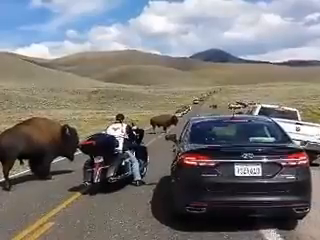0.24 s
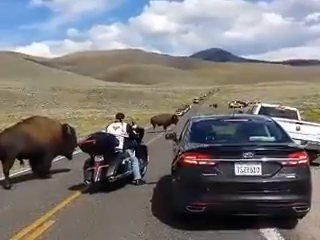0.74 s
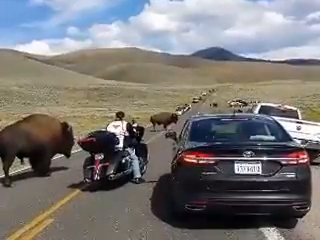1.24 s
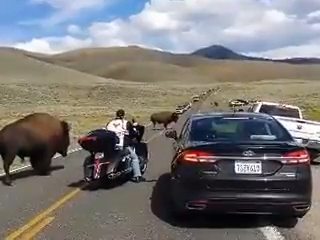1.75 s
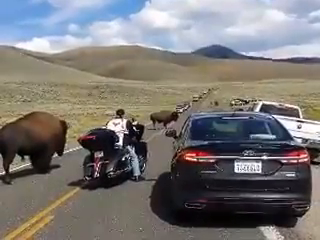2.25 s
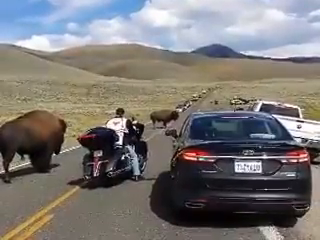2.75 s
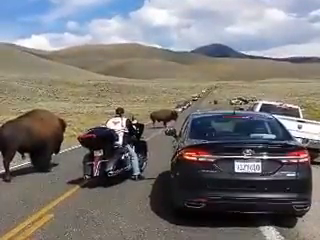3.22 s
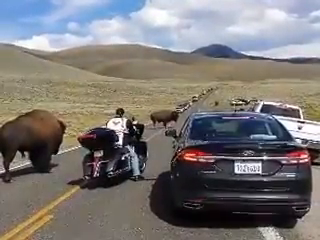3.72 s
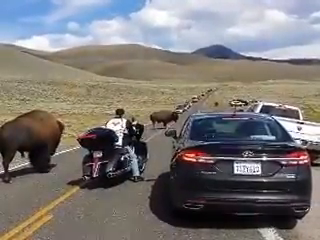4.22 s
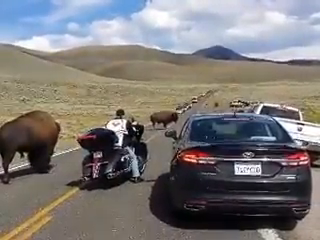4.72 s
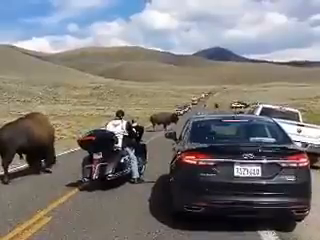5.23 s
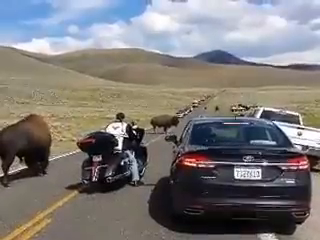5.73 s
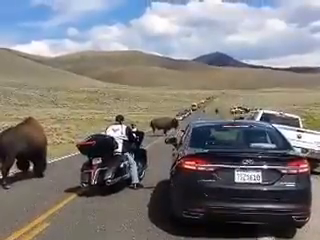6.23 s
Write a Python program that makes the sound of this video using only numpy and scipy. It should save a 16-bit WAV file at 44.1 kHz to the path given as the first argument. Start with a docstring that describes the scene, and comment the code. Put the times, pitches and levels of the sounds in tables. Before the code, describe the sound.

Outdoors on an open grassland road, idling cars give a quiet, steady low rumble, a slightly wavering hum and a soft hiss for all 6.3 seconds. At 0 a bison bull is already in a deep, guttural bellow, its irregular pops ringing a long throat; it closes down and fades by about 0.6. Wind bumps flutter low on the left, strongest around 0.8-1.2 and again near 1.8-1.9. From about 2.5 to 3.0 comes a short breathy grunt from the left, with sharp dry clicks and tiny rising squeaks. At 3.4 the long bellow bursts out nearly ahead, loudest from 3.5 to 4.5, rough, rattling and pulsing, with hissing air and a faint whistle. It weakens through 5.3 into a faint low rumble, leaving the cars. Stereo microphone outdoors, only a thin, short scattered reflection.

```python
"""A bison bull on a road in open grassland bellows beside a line of idling cars, whose rumble, hum and hiss last throughout.
His slack vocal folds flap irregularly; each pop rings the long throat anew, its lowest resonance carrying the roar.
Light wind then bumps the left microphone port, before a short grunt with sharp crackling clicks and tiny squeaks.
A long bellow follows and dies in a rumble; turbulent air hisses and whistles through his mouth in each call."""
import sys
import numpy as np
from scipy import signal
from scipy.fft import rfft, irfft, next_fast_len
from scipy.io import wavfile
from scipy.ndimage import uniform_filter1d, map_coordinates

SR = 44100
rng = np.random.default_rng(int(sys.argv[2]) if len(sys.argv) > 2 else 0)


def output_pcm(signal):
    """Save a mono or channel-first signal as 16-bit PCM at the path in sys.argv[1].

    Samples are clipped to [-1, 1] before scaling.
    """
    pcm = np.clip(np.atleast_2d(signal).T, -1, 1) * 32767
    wavfile.write(sys.argv[1], SR, np.round(pcm).astype(np.int16))


N = 285327


def amp(db):
    """Level: decibels become an amplitude ratio."""
    return 10 ** (np.asarray(db) / 20)


def unit(x):
    """Normalisation: a signal scaled to rms 1."""
    return x / np.sqrt(np.mean(x ** 2) + 1e-20)


def along(points, hz):
    """Spectral envelope: (frequency, value) points joined on a logarithmic frequency axis."""
    f, v = np.transpose(points)
    return np.interp(np.log(hz + 1), np.log(f + 1), v)


def curves(rows):
    """Linear interpolation: one value per sample for each column after the time."""
    s, *cols = np.transpose(rows)
    return [np.interp(np.arange(N) / SR, s, c) for c in cols]


def posture(table, opening):
    """Articulation: each column of a table at the mouth's present opening."""
    steps, *cols = np.transpose(table)
    return [np.interp(opening, steps, c) for c in cols]


def wobble(rate):
    """Random modulation: a smooth curve through random knots, rate of them a second."""
    knots = rng.standard_normal(int(N * rate / SR) + 4)
    return map_coordinates(knots, [np.arange(N) * rate / SR])


def swell(s, length):
    """Gaussian envelope: a smooth rise and fall around time s, with half length in s."""
    return np.exp(-2 * ((np.arange(N) / SR - s) / length) ** 2)


def filtered(x, response):
    """Linear filtering: the spectrum of x times a complex frequency response."""
    m = next_fast_len(N + SR // 2)
    return irfft(rfft(x, m) * response(np.fft.rfftfreq(m, 1 / SR)), m)[..., :N]


def equal_power_pair(balance_db):
    """Constant-power balance: left and right gains for a given left-right level difference."""
    pair = amp([balance_db / 2, -balance_db / 2])
    return pair / np.sqrt(np.mean(pair ** 2, axis=0))


# likeness of noise at the two ports: pitch_hz (Hz), correlation (-1 to 1)
PORT_CORRELATION = [(30, 1), (150, 0.87), (500, 0.75), (1000, 0.3), (2000, 0), (4000, 0), (12000, 0.026)]


def rush(spectrum):
    """Partial coherence: stereo noise of rms 1, alike in the bass and unrelated in the treble."""
    def mid_side(hz):
        angle = np.arccos(np.clip(along(PORT_CORRELATION, hz), -1, 1)) / 2
        return amp(along(spectrum, hz)) * [np.cos(angle), np.sin(angle)]

    mid, side = filtered(rng.standard_normal((2, N)), mid_side)
    return unit(np.array([mid + side, mid - side]))


def ring(drive, hz, width):
    """Resonance: a damped mode of moving frequency; a unit pulse rings at amplitude 1."""
    turn = np.exp(2j * np.pi * np.cumsum(hz) / SR)
    decay = np.exp(-np.pi * width / SR)
    return np.imag(turn * signal.lfilter([1], [1, -decay], drive / turn))


# tones of the idling engine: pitch_hz (Hz), level_db (dB, peak amplitude before the waver)
ENGINE_TONES = [(161.5, -39.5), (324, -40.5), (393, -50.5), (716, -52), (877, -70)]
# spectrum of the cars' rumble: pitch_hz (Hz), level_db (relative dB per Hz)
RUMBLE_SPECTRUM = [(15, 1), (26, -20), (36, -7), (55, -5.5), (80, 0.5), (160, -2), (260, -8), (400, -8.5),
                   (550, -13.5), (750, -13), (1000, -16), (1500, -19.5), (2500, -28.5), (4000, -87)]
# spectrum of the even hiss: pitch_hz (Hz), level_db (relative dB per Hz)
HISS_FLOOR_SPECTRUM = [(1200, -10), (2300, 2.5), (3500, 6.5), (4100, -0.5), (5300, 5), (6100, 2),
                       (6800, -2), (8000, 4), (9400, -3.5), (10400, -2.5), (11700, -9.5), (15000, -15.5)]


def roadside():
    """Periodic and random sources: idling cars hum at a slightly uneven speed and rumble under a hiss."""
    waver_db = 1.2
    turning = np.arange(N) / SR + np.cumsum(.008 * wobble(14)) / SR
    hum = np.zeros(N)
    for hz, db in ENGINE_TONES:
        hum += amp(db + waver_db * wobble(2.84)) * np.sin(2 * np.pi * hz * turning)
    rumble = amp(-35.0 + waver_db / 2 * wobble(4.0)) * rush(RUMBLE_SPECTRUM)
    hiss = amp(-45.0 + 0.27 * wobble(2.63)) * rush(HISS_FLOOR_SPECTRUM)
    # the two ports colour the treble differently: (Hz, left-right dB)
    tilt = [(2500, -1.0), (4500, 0.0), (5800, 5.5), (7000, -6.5),
            (8200, -14.0), (10000, -16.5), (12000, -3.0)]
    hiss = filtered(hiss, lambda hz: equal_power_pair(along(tilt, hz)))
    return hum + rumble + hiss


CALM_DB, GUST_DB = -54.5, -32.5  # the breeze and its one broad gust, left port, before random gusting
GUST_S, GUST_LENGTH_S = 0.68, 1.0  # the gust's centre and half length
# short wind bumps: start_s (s, centre), level_db (dB, envelope peak), pitch_hz (Hz)
WIND_BUMPS = [(0.814, -11.5, 93), (0.871, -15, 110), (1.115, -16, 117), (1.15, -8, 131), (1.186, -15, 84.5),
              (1.755, -15.5, 88), (1.846, -19, 80), (1.882, -12, 97)]
# spectrum of the low wind flutter: pitch_hz (Hz), level_db (relative dB)
WIND_SPECTRUM = [(15, -15), (50, 11), (90, 5.5), (150, 9), (260, -5), (600, -46), (1200, -120)]


def wind(spread):
    """Turbulent pressure: short eddies and a low flutter on the left port, little on the right."""
    t = np.arange(N) / SR
    strength = amp(CALM_DB) + amp(GUST_DB) * swell(GUST_S, GUST_LENGTH_S)
    gusts = strength * amp(5 * wobble(11)) * rush(WIND_SPECTRUM)[0]
    for s, db, hz in WIND_BUMPS:
        phase = rng.uniform(0, 2 * np.pi)
        gusts += amp(db) * np.exp(-np.abs(t - s) / spread) * np.sin(2 * np.pi * hz * (t - s) + phase)
    return gusts * amp([[0], [-19]])  # left, right


SCATTER_DB = -18
# decay of the scattered sound: pitch_hz (Hz), t60_s (s to fall 60 dB)
SCATTER_DECAY = [(200, 0.5), (1000, 0.35), (6000, 0.05)]


def scatter(x):
    """Diffuse reflection: a thin answer from the cars and the slopes, dying sooner in the treble."""
    hz, t, z = signal.stft(rng.standard_normal((2, SR // 2)), SR, nperseg=256)
    fall = amp(-60 * t / along(SCATTER_DECAY, hz)[:, None])
    tail = signal.istft(z * fall, SR, nperseg=256)[1]
    tail = tail + 0.86 * tail[::-1]  # each port shares the other's tail
    delayed = np.pad(x, (500, 0))[None]  # samples
    return signal.fftconvolve(delayed, tail / np.linalg.norm(tail[0]), axes=1)[:, :N]


# first bellow, grunt, long bellow, one list each:
# start_s (s), effort_db (relative dB), rasp_db (upper resonances, relative dB)
CALLS = [
    [(0, 3, -26), (.06, -12.5, -32), (.1, -14, -26), (.14, -11, -20), (.195, -12, -29), (.25, -12, -30.5),
     (.29, -11, -32), (.39, -14.5, -33), (.44, -19, -37), (.48, -18, -30), (.52, -34, -55), (.57, -19, -42),
     (.66, -55, -53)],
    [(2.62, -36, -38), (2.69, -41, -44), (2.72, -32, -27), (2.76, -32, -35), (2.79, -31, -46),
     (2.865, -21, -38), (2.895, -31, -52), (2.96, -35, -42)],
    [(3.34, -36, -54), (3.38, -39, -36), (3.43, -18, -25), (3.47, -5.5, -17), (3.51, -16, -27),
     (3.55, -15, -14.5), (3.62, -11.5, -26), (3.68, -9, -19.5), (3.715, -18, -19), (3.775, -14, -26),
     (3.87, -18.5, -26), (3.9, -17, -28), (3.985, -10, -25), (4.015, -43, -18), (4.048, -17, -26),
     (4.075, -46, -28), (4.115, -16, -27.5), (4.18, -9.5, -21.5), (4.205, -26.5, -19.5), (4.245, -6.5, -25),
     (4.33, -28.5, -36), (4.41, -8, -24.5), (4.46, -28, -36), (4.62, -17, -34), (4.66, -33, -28),
     (4.74, -14, -30), (4.78, -22, -38), (4.92, -25, -30.5), (5.09, -17, -45), (5.15, -18.5, -38),
     (5.33, -28, -43), (5.42, -35, -60), (5.85, -38, -51), (6.2, -40, -48)],
]


def calling():
    """Gating: 1 during a call, 0 between calls, with short ramps."""
    t = np.arange(N) / SR
    gate = sum(1. * (t >= c[0][0]) * (t <= c[-1][0]) for c in CALLS)
    return uniform_filter1d(gate, size=900)


# loudest pops of the folds: start_s (s), then relative levels:
# boom_db (chest, dB), bark_db (mouth, dB), snap_db (upper resonances, dB)
FOLD_POPS = [(0.014, -18, -19, -18.5), (0.054, -7, -31.5, -24.5), (0.084, -10, -28, -24),
             (0.099, -13, -30, -24.5), (0.132, -9, -42, -19), (0.16, -5, -31, -19),
             (0.18, -27, -18.5, -24.5), (0.199, -15, -19.5, -22), (0.231, -4.5, -36, -22.5),
             (0.285, -17, -31, -30), (0.31, -9, -26, -29), (0.34, -12, -37, -36), (0.36, -11, -34, -32.5),
             (0.426, -20, -36, -31.5), (0.461, -13.5, -23.5, -35), (0.538, -11.5, -24, -53),
             (0.584, -22, -26, -41.5), (2.641, -30, -28, -22.5), (2.673, -15.5, -22, -16.5),
             (2.704, -17, -21, -18), (2.739, -13, -20.5, -15.5), (2.775, -13.5, -22, -17),
             (2.811, -13, -33, -30), (2.834, -10, -26, -38), (2.858, -13.5, -36, -36),
             (2.911, -25, -36, -47), (3.369, -15, -48, -36.0), (3.409, -15, -22, -22.5),
             (3.427, -17, -16, -32), (3.452, -15, -12.5, -17.5), (3.493, -17, -18, -19),
             (3.521, -10, -9, -15), (3.533, -8.5, -26, -21.5), (3.549, -12, -14.5, -23),
             (3.572, -10, -16, -21), (3.592, -12, -15.5, -20.5), (3.641, 3, -16.5, -34),
             (3.665, -9, -27, -31), (3.702, -26, -12, -27.5), (3.745, -13, -16, -35),
             (3.77, -5.5, -32, -25.5), (3.79, -9.5, -28, -20), (3.836, -12, -23, -27),
             (3.889, -5, -22, -26), (3.916, -7.5, -21, -24), (3.963, -1, -27, -29), (3.985, -10, -27, -24),
             (3.999, -37, -13, -18), (4.019, -20, -16, -20), (4.038, -2, -44, -21),
             (4.09, -8.5, -24, -23.5), (4.14, -9, -19, -21), (4.193, -17, -11, -34), (4.22, -3, -31, -31),
             (4.238, -9.5, -27, -27), (4.272, -11, -24, -31), (4.296, -7, -32, -22), (4.348, -7, -23, -19),
             (4.371, -8, -29, -27), (4.438, -9.5, -33, -24.5), (4.466, -15, -32, -24),
             (4.499, -6, -28.5, -19), (4.556, -9.5, -28, -21), (4.585, -10.5, -24, -27),
             (4.615, -10.5, -39, -26.5), (4.684, -7.5, -23, -27), (4.72, -10, -21.5, -23),
             (4.827, -12, -43, -27), (4.861, -6.5, -24, -20.5), (4.931, -8.5, -24, -26),
             (4.971, -13, -40, -25.5), (5.007, -13.5, -23, -26), (5.037, -11.5, -23, -22.5),
             (5.068, -7.5, -20, -20.5), (5.108, -17, -28, -29), (5.186, -14.5, -25.5, -30),
             (5.221, -21, -27.5, -31), (5.261, -14, -21, -31), (5.306, -13, -25, -32.5),
             (5.341, -20, -54, -34.5)]


def pop_train(column):
    """Impulse excitation: one impulse per pop, sized by a level column of the table."""
    rows = np.array(FOLD_POPS)
    return np.bincount(np.round(rows[:, 0] * SR).astype(int), amp(rows[:, column]), N)


# the throat's changing shape: start_s (s), opening (mouth, 0-1), chest_hz (Hz), mouth_hz (Hz)
THROAT_SHAPE = [(0, .9, 219.6, 663), (.19, 0.98, 223, 628), (.26, 0.68, 233, 674), (.38, 0.32, 227, 710),
                (.46, 0.12, 217, 800), (.58, 0.02, 209.5, 790), (2.67, 1, 230.5, 644), (2.78, 1, 225, 621),
                (2.85, 0.48, 208, 636), (2.93, 0.41, 191.5, 607), (3.38, 0.74, 166.6, 650),
                (3.43, 0.99, 221.7, 670), (3.5, 0.98, 252, 664), (3.6, 0.89, 232, 635),
                (3.73, .9, 239.8, 630), (3.9, 0.73, 241.5, 613), (4.04, .85, 230.8, 606),
                (4.14, 0.85, 233, 627), (4.2, .9, 220, 576), (4.28, .7, 234, 620), (4.4, 0.49, 225.5, 676),
                (4.73, 0.35, 226, 670), (4.81, 0.49, 213, 662), (5.02, 0.41, 226.4, 670),
                (5.2, 0.38, 223, 723), (5.28, 0.15, 222, 775), (5.4, 0.02, 206, 800),
                (6.2, 0.15, 216.3, 690)]


def throat_shape():
    """Moving resonator: mouth opening, chest and mouth resonances at each sample."""
    return curves(THROAT_SHAPE)


AIR_DB, AIR_PER_EFFORT, AIR_OPEN_DB = -43.5, 0.59, 4  # base, dB per dB of effort, rise on full opening
SPURT = 6  # extra power of the airstream per unit of pop
# the bull's snorts: start_s (s, centre), length_s (s, half length), level_db (dB before spurts and flicker)
SNORT_SWELLS = [(0.104, 0.094, -51.5), (2.59, 0.14, -46.5), (2.783, 0.17, -45), (2.988, 0.064, -45.5)]
# spectrum of the breath: pitch_hz (Hz), level_db (relative dB)
BREATH_SPECTRUM = [(600, -26), (1400, 8.5), (1800, 7), (2400, -0.5), (3100, 4.5), (4100, -2), (5200, 0),
                   (7000, -6), (9000, -9), (14000, -28)]
# thin whistles and short rasps: start_s (s, centre), length_s (s, half length), pitch_hz (Hz),
# level_db (dB rms before the swell and flicker)
AIR_WHISTLES = [(0.114, 0.29, 6400, -50.5), (0.173, 0.01, 3480, -39), (0.387, 0.22, 7400, -48.5),
                (2.677, 0.055, 4800, -43.5), (3.566, 0.04, 2973, -43), (4.352, 0.5, 8704, -51.5)]


def airstream():
    """Turbulent flow: air hisses with effort and opening, whistles now and then and spurts with each pop."""
    effort, _ = curves(np.vstack(CALLS))
    opening, _, _ = throat_shape()
    flow = calling() * amp(AIR_DB + AIR_PER_EFFORT * effort + AIR_OPEN_DB * opening)
    snorts = sum(amp(db) * swell(s, length) for s, length, db in SNORT_SWELLS)
    spurts = 1 + SPURT * signal.lfilter([1], [1, -np.exp(-1 / (0.0015 * SR))], pop_train(3))
    flicker = amp(3.56 * wobble(110) + 1.8 * wobble(12))
    air = (flow * np.sqrt(spurts) + snorts * spurts ** 0.51) * flicker * rush(BREATH_SPECTRUM)
    whistle_flicker_db = 3 * wobble(70)
    for s, length, hz, db in AIR_WHISTLES:
        peak = signal.iirpeak(hz, Q=7, fs=SR)
        narrow = unit(signal.lfilter(*peak, rng.standard_normal((2, N))))
        air += amp(db + whistle_flicker_db) * swell(s, length) * narrow
    # a fine fizz while the long bellow is at full force
    fizz = swell(4.28, 1.14) * amp(-49.0 + 3.6 * wobble(26.67))
    return air + fizz * rush([(3000, -27.5), (5500, 15), (9500, 0), (14000, -25)])


SQUEAK_S, SQUEAK_RISE_HZ_PER_S = 0.0055, 140000  # half length; upward glide
# sharp crackling clicks, many of them the bright cracks of the grunt's pops:
# start_s (s), pitch_hz (Hz, band centre), level_db (dB peak before placing)
GRUNT_CLICKS = [(2.498, 1900, -29), (2.59, 2110, -36), (2.673, 1350, -25), (2.706, 1400, -24),
                (2.722, 1550, -28), (2.74, 1500, -23), (2.757, 1650, -28), (2.776, 1600, -21),
                (2.792, 1650, -22), (2.812, 2600, -33)]
# tiny squeaks in the grunt: start_s (s, centre), pitch_hz (Hz, at the centre), level_db (dB before placing)
RISING_SQUEAKS = [(2.664, 4900, -37), (2.695, 4750, -33), (2.741, 4650, -35), (2.824, 3500, -36)]


def clicks_and_squeaks(decay_s, rough):
    """Band-limited impulses and chirps: sharp crackling clicks around the grunt, with rising squeaks."""
    t, out = np.arange(N) / SR, np.zeros(N)
    age = t[:SR // 30]
    for s, hz, db in GRUNT_CLICKS:
        burst = (age == 0) + rough * np.exp(-age / decay_s) * rng.standard_normal(len(age))
        band = signal.butter(2, [hz / 1.25, hz * 1.25], 'band', fs=SR, output='sos')
        click = signal.sosfilt(band, burst)
        out[round(s * SR):][:len(age)] += amp(db) * click / np.abs(click).max()
    for s, hz, db in RISING_SQUEAKS:
        cycles = (t - s) * (hz + SQUEAK_RISE_HZ_PER_S * (t - s) / 2)
        out += amp(db) * swell(s, SQUEAK_S) * np.sin(2 * np.pi * cycles)
    return out


SLACK_FLAPS_HZ, OPEN_FLAPS_HZ = 26.23, 42.3  # flaps a second with the mouth shut; added when wide open
JITTER, UNEVEN_DB = .07, 2  # unevenness of the flaps: timing (periods), strength (dB)


def flutter(opening):
    """Quasi-periodic vibration: weak flaps divide pop-to-pop times almost evenly, faster as the mouth opens."""
    cycles = np.cumsum(SLACK_FLAPS_HZ + OPEN_FLAPS_HZ * opening) / SR
    marks = np.append(cycles[np.flatnonzero(pop_train(1))], cycles[-1])
    beats = np.concatenate([np.linspace(a, b, max(round(b - a), 1) + 1)[1:-1]
                            for a, b in zip(marks, marks[1:])])
    chance = rng.standard_normal((900, 2))[np.round(beats).astype(int)]
    places = np.searchsorted(cycles, beats + JITTER * chance[:, 0]).clip(0, N - 1)
    return np.bincount(places, amp(UNEVEN_DB * chance[:, 1]), N)


ROUGH = .03  # strength of the turbulence


def puffed(flaps):
    """Aspiration noise: each flap is followed by a puff of turbulence."""
    puffs = signal.lfilter([1], [1, -np.exp(-1 / (0.016 * SR))], flaps)
    return flaps + ROUGH * puffs * rng.standard_normal(N)


SAG_DB_PER_S = 300


def sag(flaps):
    """Damping: a gain around 1 that jumps at each flap or pop and falls until the next."""
    n = np.arange(N)
    since = (n - np.maximum.accumulate(n * (flaps + pop_train(1) > 0))) / SR
    gain = uniform_filter1d(amp(-SAG_DB_PER_S * np.minimum(since, .04)), size=160)
    return gain / uniform_filter1d(gain, size=4400)


WIDEST_SWING_DB = -6.5  # losses in the throat cap the swing of its lowest resonance
STALL_S, CLOSE_S = 0.02, 0.0031  # time constants of the weakening and the closure before a pop
# chest, nasal, mouth, third and highest resonance: width_hz (Hz), level_db (ring of a pop, relative dB)
THROAT_RESONANCES = [(22, -0.2), (19.2, 3), (36, 3), (68, 2.5), (130, -6.5)]


def chest(effort, hz, flaps, stall_db, waver_db):
    """Self-sustained oscillation: each pop restarts the lowest resonance, which settles to the swing
    that the airflow sustains until the folds stick again."""
    t = np.arange(N) / SR
    s, boom_db, _, _ = np.transpose(FOLD_POPS)
    after = np.searchsorted(s, t)
    last, wait = np.append(0, s)[after], np.append(s, np.inf)[after] - t
    width, db = THROAT_RESONANCES[0]
    fresh = np.exp(-np.pi * width * (t - last))
    sustained = np.sqrt(2) * calling() * sag(flaps) * amp(effort + waver_db * wobble(90))
    size = fresh * np.append(0, amp(boom_db + db))[after] + (1 - fresh) * sustained
    size = size / (1 + (size / amp(WIDEST_SWING_DB)) ** 4) ** (1 / 4)
    stall = amp(-stall_db * np.exp(-wait / STALL_S)) * (1 - np.exp(-wait / CLOSE_S))
    swing = np.cumsum(hz) / SR  # cycles, counted anew from each pop
    return size * stall * np.sin(2 * np.pi * (swing - np.interp(last, t, swing)))


SLAP_S, SMEAR_S = .0035, .0005  # decay and onset of a slap


def slaps(snaps):
    """Impact noise: the wet folds slap as they meet, each a brief broad burst."""
    t = np.arange(SR // 20) / SR
    burst = np.exp(-t / SLAP_S) * (1 - np.exp(-t / SMEAR_S))
    noise = signal.fftconvolve(snaps, burst)[:N] * rng.standard_normal(N)
    return signal.sosfilt(signal.butter(3, [420, 1350], 'band', fs=SR, output='sos'), noise)


THROB_HZ, THROB_WIDTH_HZ = 113, 103  # the low push of air from each flap
THIRD_HZ, TOP_RATIO = 971, 1.262  # third resonance, and the highest over it
THIRD_DB, TOP_DB = -5.5, -4.5  # share of the rattle in the two highest resonances
# the nasal resonance with the mouth: opening (0-1), pitch_hz (Hz)
NASAL_TUNING = [(0, 540), (.1, 533), (.35, 478), (1, 500)]
# a shut mouth sends the sound through the nose: opening (0-1), nasal_db (dB), mouth_db (dB)
NOSE_AND_MOUTH = [(0, -6.5, -40), (.15, -2, -8), (.4, -6, -1.5), (.7, -17, -1.5), (1, -27, -1)]


def bellow(chest_db, rasp_db, throb_db, slap_db):
    """Source and filter: pops ring the throat; a weaker flutter of the folds keeps it rattling between."""
    effort, rasp = curves(np.vstack(CALLS))
    opening, chest_hz, mouth_hz = throat_shape()
    nose, mouth = posture(NOSE_AND_MOUTH, opening)
    nasal_hz, = posture(NASAL_TUNING, opening)
    lowest = chest_hz * (1 + 0.034 * wobble(55))
    flaps = calling() * flutter(opening)
    voice = chest(effort + chest_db, lowest, flaps, stall_db=1.5, waver_db=4.5)
    push = amp(throb_db) * opening * (flaps * amp(effort) + pop_train(1))
    voice += ring(push, np.full(N, THROB_HZ), THROB_WIDTH_HZ)
    barks, snaps = pop_train(2), pop_train(3)
    rattle = puffed(flaps) * amp(rasp + rasp_db)
    upper = [(nasal_hz, amp(nose) * (barks + rattle), 1),  # (Hz, strikes, sign)
             (mouth_hz, amp(mouth) * (barks + rattle), -1),
             (THIRD_HZ, snaps + amp(THIRD_DB) * rattle, -1),
             (THIRD_HZ * TOP_RATIO, snaps + amp(TOP_DB) * rattle, 1)]
    for (hz, strikes, sign), (width, db) in zip(upper, THROAT_RESONANCES[1:]):
        voice += sign * amp(db) * ring(strikes, hz * (1 + 0.024 * wobble(30)), width)
    voice += amp(slap_db) * slaps(snaps)
    # the soft closure dulls the top; the mouth radiates little bass
    voice = signal.sosfilt(signal.butter(4, 1600, fs=SR, output='sos'), voice)
    return signal.sosfilt(signal.butter(4, 68, 'high', fs=SR, output='sos'), voice)


def placed(x, lead_s, balance):
    """Interaural cues: the left port hears x earlier by lead_s, and louder by the balance."""
    def ports(hz):
        lead = np.exp(1j * np.pi * hz * lead_s * np.array([[1], [-1]]))
        return lead * equal_power_pair(along(balance, hz))

    return filtered(x, ports)


BELLOW_LAG_S, GRUNT_LEAD_S = .00009, 0.00032  # arrival at the left port against the right
# left-right balance of the bellows: pitch_hz (Hz), level_db (left over right, dB)
BELLOW_SIDES = [(220, 0.5), (620, 2.1), (1000, -0.5), (1400, -8.5)]
# left-right balance of the grunt: pitch_hz (Hz), level_db (left over right, dB)
GRUNT_SIDES = [(220, 3.5), (1000, 3)]


def scene():
    """Superposition: bellows from nearly straight ahead, a grunt from well to the left, and the background."""
    voice = bellow(chest_db=-1.6, rasp_db=2.5, throb_db=-16.5, slap_db=9.5)
    t = np.arange(N) / SR
    grunting = (t > 2.3) * (t < 3.2)
    bellows = placed(voice * (1 - grunting), -BELLOW_LAG_S, BELLOW_SIDES)
    grunt = voice * grunting + clicks_and_squeaks(decay_s=0.0048, rough=0.46)
    direct = bellows + placed(grunt, GRUNT_LEAD_S, GRUNT_SIDES)
    scattered = amp(SCATTER_DB) * scatter(voice)
    return direct + scattered + airstream() + wind(spread=0.0064) + roadside()


TOP_HZ = 14980


def record(dry):
    """Band limitation: nothing passes at or above the top frequency."""
    return filtered(dry, lambda hz: hz < TOP_HZ)


dry = scene()
out = record(dry)
output_pcm(out)
```